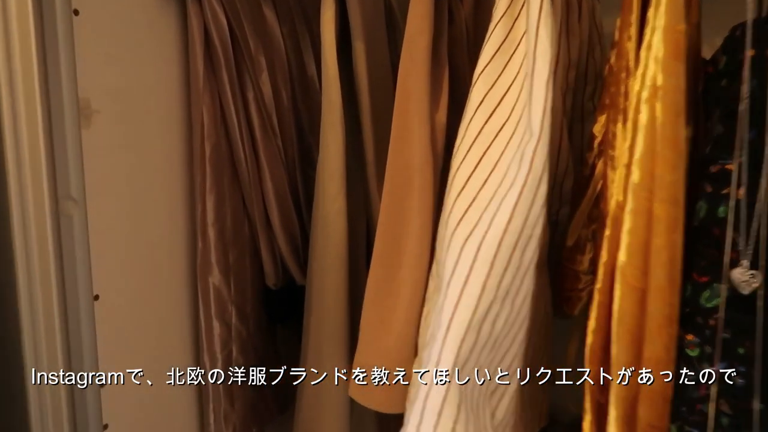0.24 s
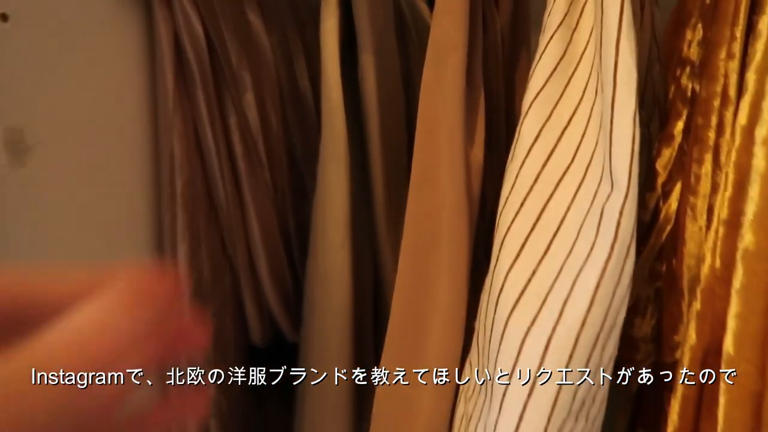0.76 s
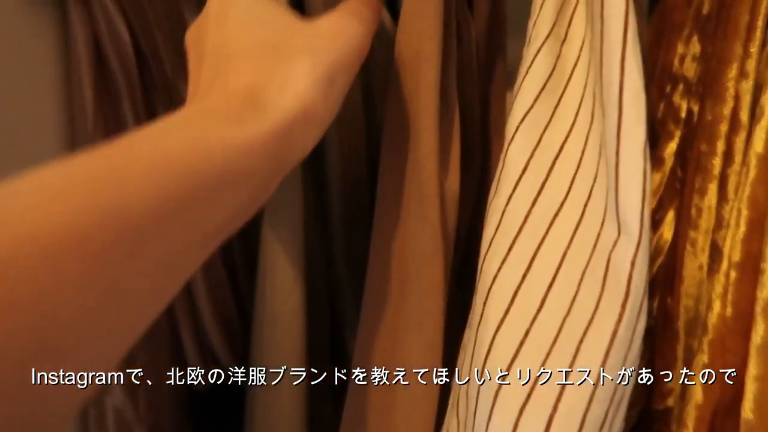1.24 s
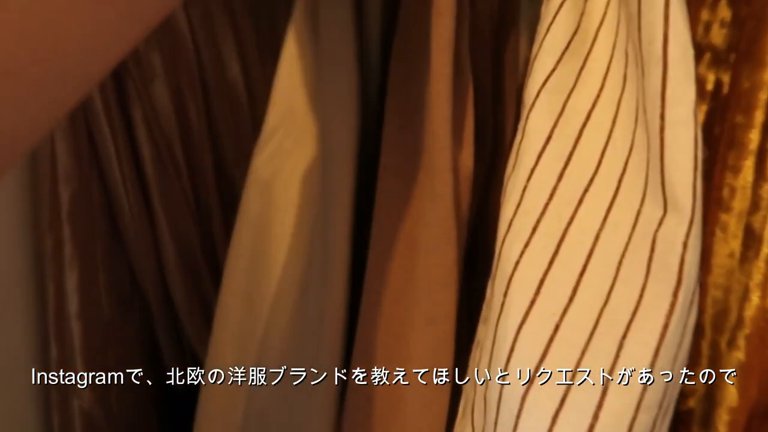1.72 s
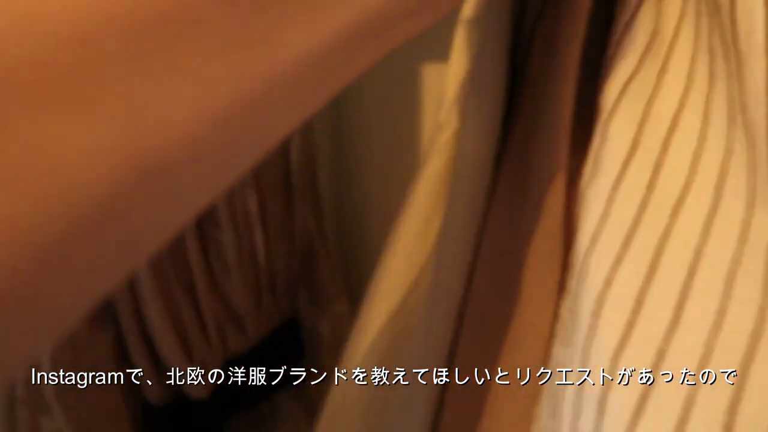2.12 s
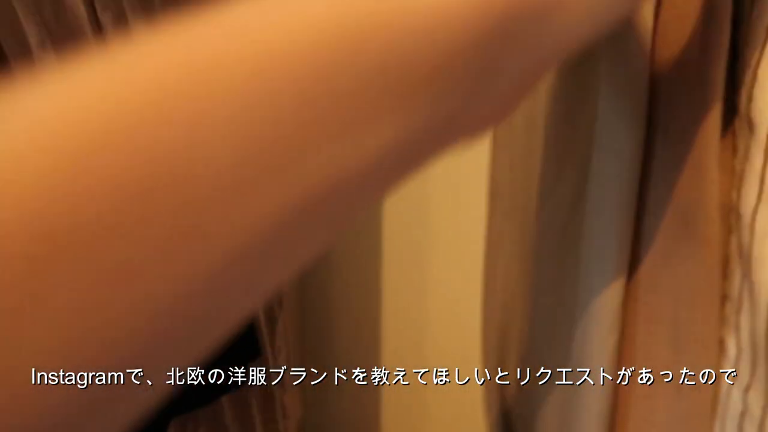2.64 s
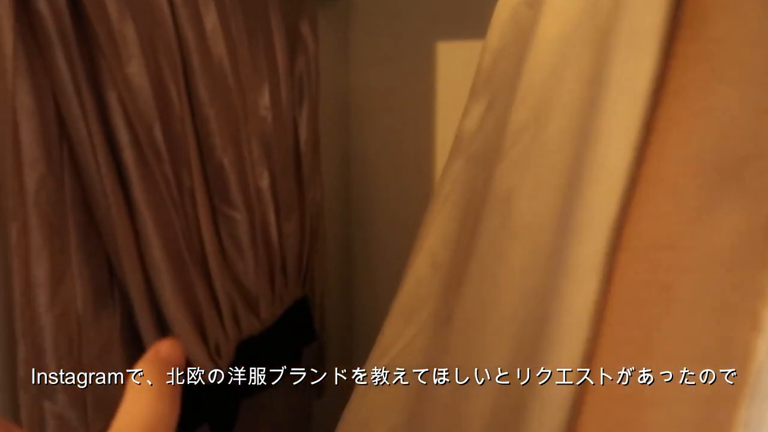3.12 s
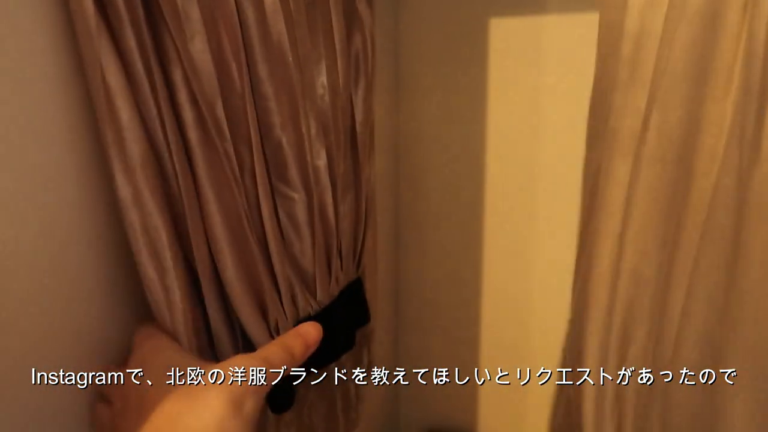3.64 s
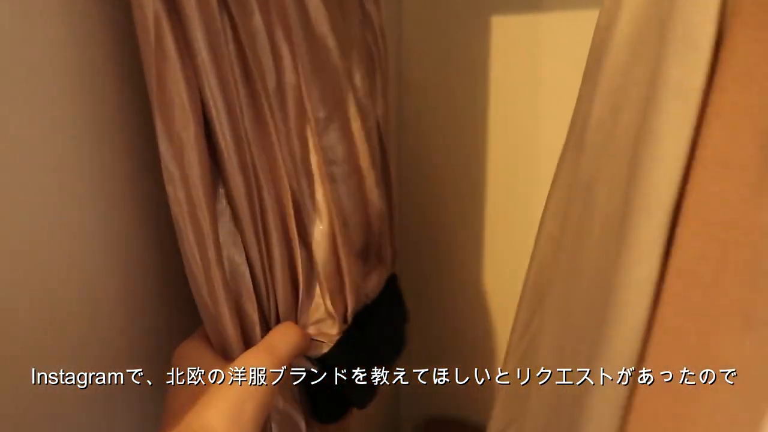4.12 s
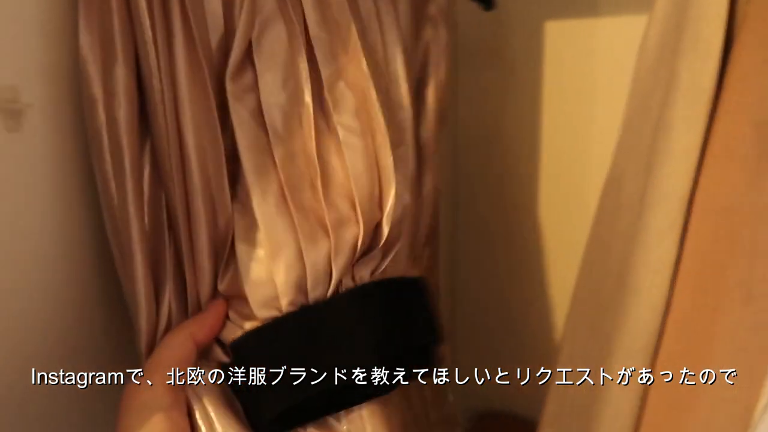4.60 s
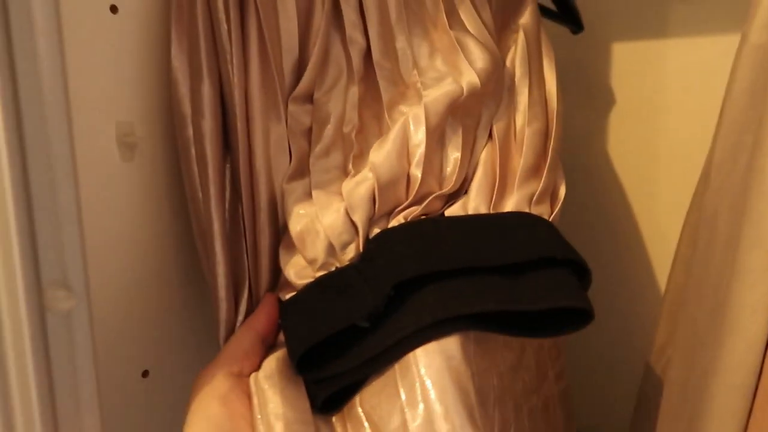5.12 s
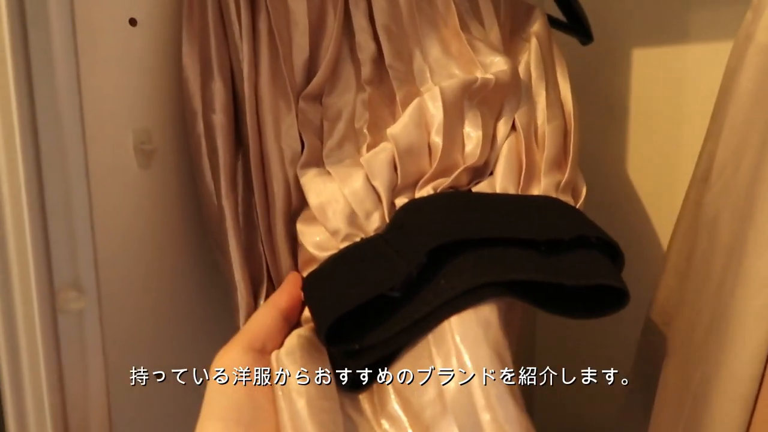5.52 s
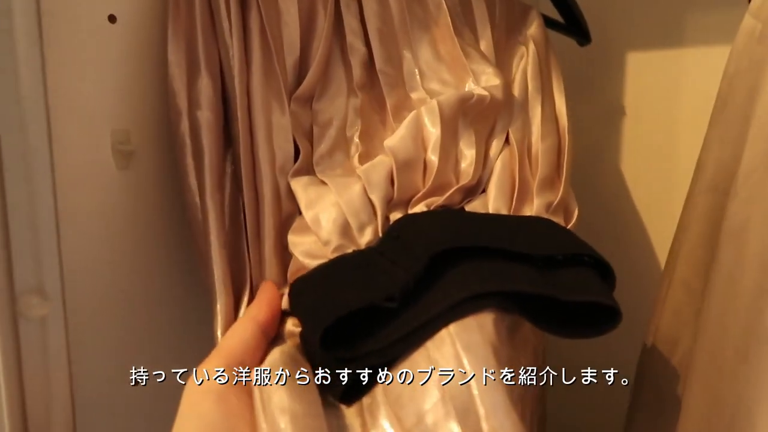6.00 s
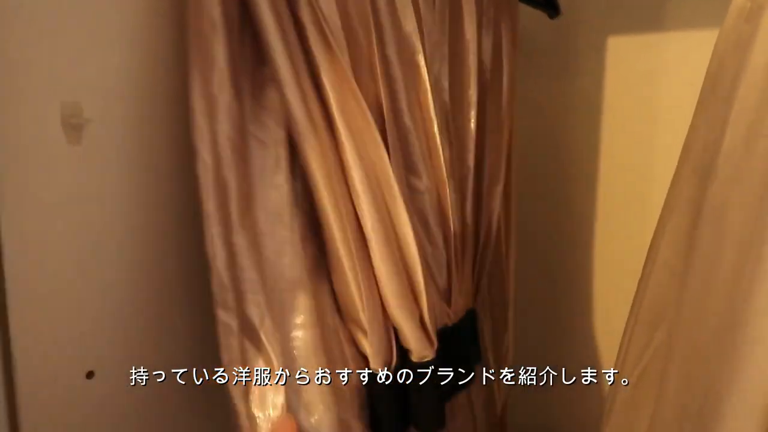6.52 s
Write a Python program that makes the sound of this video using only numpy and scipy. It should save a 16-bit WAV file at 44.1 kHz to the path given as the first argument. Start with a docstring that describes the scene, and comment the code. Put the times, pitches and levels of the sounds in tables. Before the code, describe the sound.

In a small closet, hooks scrape and ring on the rail, hangers knock together, padded thumps follow, and a garment rustles lightly.

```python
"""Faint room hiss with mains hum, then a dull thud and bursts of clacking hangers from a small closet.
Clothes are pushed along the rail: hangers clack as noise bursts and decaying modes, hooks scrape and
squeak amid brief high tones and noise bursts, and the rail rings as a bank of resonators. Thuds are low
panel, frame and air modes. Cloth rustles softly as a garment is drawn out; dense reflections put hangers
and thuds in the closet."""
import sys
import numpy as np
from scipy import signal
from scipy.fft import rfft, irfft, next_fast_len
from scipy.io import wavfile

SR = 44100
rng = np.random.default_rng(int(sys.argv[2]) if len(sys.argv) > 2 else 0)


def to_wav(sig):
    """Store sig (one row per channel, or 1-D mono) as 16-bit WAV at the path in sys.argv[1].

    Samples outside -1..1 are clipped; the rate is SR.
    """
    pcm = np.clip(np.atleast_2d(sig), -1, 1) * 32767
    pcm = np.round(pcm).astype(np.int16)
    wavfile.write(sys.argv[1], SR, pcm.T)  # frames by channels


N = 297675
TIME_S = np.arange(N) / SR
CONTACT_ORDER = 3   # low-pass order of a blow's finite contact time

# hanger clacks: start_s, strength_db, brightness_db_per_octave, contact_cutoff_hz, base_t60_s, left_right_db,
# favoured modes [(pitch_hz, level_db over the strength), ..]
CLACKS = [(1.9077, -28, 3, 4950, 0.018, 0.0039, [(1370, -2.5), (1990, 0), (2160, -6), (2685, 3),
          (3050, -2.5), (3430, -7.5), (4170, 0), (4650, -7), (5750, -12.5), (7200, -12)]),
          (1.9123, -38, -1, 3500, .035, 0, [(1400, -1.5), (1990, 4), (2350, 1.5), (4450, 0)]),
          (1.9235, -43, -1.5, 4500, .04, 0, [(1420, -12), (2400, -2), (6150, -5)]),
          (1.929, -48.5, 0.5, 5000, .09, 0, [(1100, -5.5), (2680, 0), (4400, -6.5)]),
          (1.993, -35.5, 0, 3600, 0.02, 0.1, [(2370, -1.5), (3030, 3), (3365, -1)]),
          (1.9961, -34, 1.5, 5200, 0.055, -0.0079, [(1222, -1), (1480, -7.5), (2000, -9.5), (3030, -16),
          (4549, -5.5), (7450, -5.5)]), (2.018, -57.5, 3, 3000, 0.042, 0, [(1010, 14.5), (1222, 2)]),
          (2.034, -58, 1.5, 7150, 0.019, 0.14, [(1500, -10), (4550, -5)]),
          (2.2433, -33, 1.5, 4870, 0.024, 1.33, [(1340, -2.5), (2627, 1.5), (3790, 7.5), (3930, -2),
          (4231, 2.5), (4580, -5), (6150, -9)]), (2.254, -45, 1, 13500, .06, -0.14, [(2110, -1.5),
          (4440, 8)]), (2.298, -63, -0.5, 4500, .04, 0, [(1230, -0.5), (2700, 1)]),
          (2.333, -62.5, 3, 8980, 0.031, -.5, [(2300, -1.5), (5200, 3)]),
          (2.364, -35.5, 4.5, 3880, 0.046, -0.18, [(1250, -5.5), (1500, -7.5), (2013, 5.5), (2600, 2.5),
          (3450, -6), (4550, -5.5)]), (2.484, -69, 8, 10500, 0.089, -0.22, [(1017, 12.5), (3850, 17.5)]),
          (2.538, -56.5, -3, 3120, 0.35, 0.21, [(1232, 10.5), (2630, 3)]),
          (2.6244, -40, 3, 5240, 0.037, -0.15, [(1167, -0.5), (1700, -4.5)]),
          (2.655, -46, 1, 5200, 0.1, -0.45, [(1147, -2), (1255, -2)]),
          (2.691, -58, 0.5, 10970, 0.085, -0.14, [(2150, -12), (3950, -3)]),
          (2.731, -60.5, -3, 2480, 0.077, 0, [(1110, 3), (1890, -7)]),
          (2.832, -57, -1, 2220, 0.11, -0.5, [(1000, -2), (2040, -2)]),
          (3.0455, -32.5, 3.5, 3630, 0.034, -0.065, [(1700, -9.5), (2001, -2.5), (2560, -15.5), (3020, -7),
          (3650, -9.5), (4370, -6), (6400, -13)]), (3.109, -63.5, -1, 3340, 0.1, -0.23, [(2030, 1.5),
          (3020, 9)]), (3.122, -61, -2.5, 3350, 0.06, -1.3, [(1300, 2), (2030, 1), (3450, -7)]),
          (3.5154, -54, 2, 5960, 0.14, -0.7, [(1182, -14), (4380, -10)]),
          (3.5483, -57.5, 2.5, 6120, 0.044, -0.16, [(1200, 5.5), (3200, -7.5)]),
          (3.582, -36, 1, 4070, 0.046, -0.25, [(1111, -2.5), (1900, -12), (2800, -5.5), (3770, -5.5),
          (4650, -22), (5350, -11)]), (3.633, -37.5, 2.5, 4330, 0.028, -0.65, [(1188, -1), (3380, -11)]),
          (3.6567, -46.5, 2.5, 4230, 0.028, -0.4, [(1140, -8), (4699, -13)]),
          (3.75, -57.5, -1.5, 9100, 0.047, -0.17, [(1150, -2.5), (3390, -8.5)]),
          (4.083, -31, 0, 3130, 0.034, 1.1, [(1480, -9.5), (1672, 0), (2150, -3), (2450, -5), (2875, -11),
          (3150, 2), (4080, -10), (4330, -11), (5900, -18)]), (4.112, -57.5, -2.5, 3500, .05, 0, [(2160, 4),
          (3150, -4)]), (4.135, -51.5, -4.5, 3246, 0.07, 0.19, [(1610, -1.5), (2150, -1.5), (3300, -8)]),
          (4.7284, -34.5, 0.5, 2400, 0.042, 1.1, [(807, -14.5), (1120, -1), (1350, -2.5), (1580, -15),
          (1972, -1.5), (2090, -4), (3140, -12.5)]), (4.751, -61, -8, 2800, .05, 1.5, [(1373, 8),
          (2100, -7)]), (4.7835, -48.5, -7, 4510, 0.057, 1.15, [(1400, 1), (2044, 5.5), (3170, -6)]),
          (4.808, -50.5, 2, 1900, 0.044, 1.5, [(1080, 0), (1400, -4), (2040, -1)]),
          (4.962, -53, 6, 1767, 0.03, 2.04, [(1290, -1), (2000, -1.5), (2294, -2)]),
          (6.043, -67, -2, 10620, .03, -0.12, [(1137, -7.5), (4340, -12.5)])]
# strong bending modes of a hanger: pitch_hz, level_db
HANGER_MODES = [(870, -26.5), (1130, -10), (1410, -9), (1990, -7.5), (2640, -13.5), (3150, -15),
                (3830, -12.5), (4330, -12)]
# modes of the rail: pitch_hz, level_db, free_t60_s
RAIL_MODES = [(260, 2.5, 0.26), (273, 3.5, 0.56), (353.3, -1, .3), (436.2, -11, .2), (544.3, -17.5, 0.36),
              (758, -4.5, 0.48), (1035, -3.5, 0.082), (1230, -2.5, 0.12), (1328, -7.5, 0.15),
              (1487, -8.5, 0.2494), (1989, -11.5, .2), (2150, -11, 0.16), (2336, -9, 0.36),
              (2780, -12, 0.1694), (3330, -11.5, .42), (3560, -9, .2), (3890, -12, .12), (4160, -13, 0.12),
              (4574, -14, 0.27), (5080, -15, 0.39), (6300, -16.5, 0.23)]
# spectrum of hooks on the rail: frequency_hz, relative_db (per Hz)
HOOK_SPECTRUM = [(7000, -27.5), (9300, 3), (11000, -3), (12800, 4), (15000, -17)]
# pushes that slide the hooks: start_s, length_s, level_db, attack_s
PUSHES = [(1.867, 0.21, -52, 0.037), (2.066, 0.22, -45.5, 0.19), (2.19, 0.048, -39.5, .06),
          (2.311, 0.14, -47.5, 0.026)]


def from_db(db):
    """Decibels to gain."""
    return np.exp(np.log(10) / 20 * np.asarray(db))


def rms_one(x):
    """Scale to unit power."""
    return x / np.sqrt(np.mean(x ** 2) + 1e-20)


def at_hz(points, hz):
    """Read a spectrum on a log-frequency axis."""
    point_hz, value = np.transpose(points)
    return np.interp(np.log(hz), np.log(point_hz), value)


def band(x, low_hz, high_hz, order=2):
    """Causal band-pass."""
    return signal.sosfilt(signal.butter(order, [low_hz, high_hz], "band", fs=SR, output="sos"), x)


def add(out, start_s, sound):
    """Mix a sound in from start_s."""
    i = max(int(start_s * SR), 0)
    out[..., i:i + sound.shape[-1]] += sound[..., :N - i]


def dying(t_s, t60_s, rise_s):
    """A quick swell, then exponential decay."""
    return (1 - np.exp(-t_s / rise_s)) * np.exp(-np.log(1000) * t_s / t60_s)


def drift(per_s):
    """A smooth random wander between normally distributed knots."""
    knots = rng.standard_normal(6000)
    return np.interp(TIME_S * per_s, np.arange(len(knots)), knots)


def ring(drive, hz, t60_s):
    """One mode: a unit click sets a decaying sine of height 1 ringing."""
    radius = from_db(-60 / (t60_s * SR))
    angle = 2 * np.pi * hz / SR
    feedback = [1, -2 * radius * np.cos(angle), radius * radius]
    return signal.lfilter([0, np.sin(angle)], feedback, drive + 1e-18)   # offset avoids denormals


def slips(per_s, spread_db):
    """Friction as a train of tiny slips of uneven size."""
    sizes = from_db(spread_db * np.minimum(rng.exponential(1, N), 4)) * rng.standard_normal(N)
    return rms_one(sizes * (rng.random(N) < per_s / SR))


def stereo(mid, side, alike):
    """Mix two independent noises into left and right of a given correlation."""
    return np.sqrt(1 + alike) * mid + np.sqrt(1 - alike) * side * [[1], [-1]]


def coloured(spectrum, likeness):
    """Stereo noise of a given colour and left-right correlation, unit power."""
    size = next_fast_len(N)
    hz = np.maximum(np.fft.rfftfreq(size, 1 / SR), 1)
    alike = np.clip(at_hz(likeness, hz), -1, 1)
    mid, side = rfft(rng.standard_normal((2, size))) * from_db(at_hz(spectrum, hz))
    return rms_one(irfft(stereo(mid, side, alike), size)[:, :N])


def noise_bands(size, likeness):
    """Half-octave bands of stereo noise with their centres; together roughly white."""
    edges_hz = np.geomspace(20, 18000, 21)
    white = rng.standard_normal((2, 2, size))
    for k, (low_hz, high_hz) in enumerate(zip(edges_hz, edges_hz[1:])):
        hz = np.sqrt(low_hz * high_hz)
        mid, side = band(white[k % 2], low_hz, high_hz, order=3)
        alike = np.clip(at_hz(likeness, hz), -1, 1)
        yield hz, stereo(mid, side, alike) / np.sqrt(2)


def placed(x, pan_db, lag_samples_per_db=1.93):
    """A source off to one side reaches the far microphone weaker and a few samples later."""
    size = next_fast_len(len(x) + 64)
    half_lag = np.exp(1j * np.pi * np.arange(size // 2 + 1) / size * pan_db * lag_samples_per_db)
    left = irfft(rfft(x, size) * half_lag, size)[:len(x)]
    right = irfft(rfft(x, size) * half_lag.conj(), size)[:len(x)]
    return np.array([left * from_db(pan_db / 2), right * from_db(-pan_db / 2)])


def at_ports(x):
    """The two microphone ports hear the treble out of step."""
    # phase by which left trails right: frequency_hz, lag_rad
    port_lag = [(60, 0), (400, .08), (1500, .24), (4000, .55), (6000, 1.2), (8000, 2.3), (14000, 2.1)]
    size = next_fast_len(N + 256)
    lag_rad = at_hz(port_lag, np.maximum(np.fft.rfftfreq(size, 1 / SR), 1))
    return irfft(rfft(x, size) * np.exp(.5j * lag_rad * np.array([[-1], [1]])), size)[:, :N]


def room_tone(hiss_rms_db=-59.22):
    """Steady coloured hiss with faint sine tones of mains hum."""
    # room hiss: frequency_hz, relative_db (per Hz)
    air = [(12, -36.5), (20, -16.5), (44, -2.5), (74, -8), (103, -11.5), (126, -10.5), (225, -8), (342, -9),
           (372, -8), (550, -14), (687, -14), (768, -14), (5100, -26), (13100, -40.5), (15500, -54)]
    # mains hum: pitch_hz, rms_db
    mains = [(50, -78), (98, -71.5)]
    # left-right correlation: frequency_hz, correlation
    air_likeness = [(60, 1), (150, 0.74), (380, 0.094), (950, -0.2), (2380, 0.13), (5980, -0.034),
                    (15000, -0.2)]
    hum = sum(from_db(db) * np.sqrt(2) * np.sin(2 * np.pi * hz * TIME_S) for hz, db in mains)
    return from_db(hiss_rms_db) * coloured(air, air_likeness) + hum


def closet(x, build_s=0.00088):
    """Diffuse reflections, soon soaked up by the clothes."""
    # reverberation level: frequency_hz, level_db
    echo_db = [(150, -5), (350, -5.5), (800, -6.5), (2000, -16), (5000, -18), (12000, -13)]
    # reverberation time: frequency_hz, t60_s
    echo_t60_s = [(80, 0.62), (300, .4), (1500, 0.36), (4000, 0.4), (12000, 0.13)]
    t_s, echo = TIME_S[:SR // 2], 0
    for hz, noise in noise_bands(len(t_s), [(300, 1.0), (2000, 0.85), (8000, .6)]):
        shape = dying(t_s, at_hz(echo_t60_s, hz), build_s)
        echo = echo + from_db(at_hz(echo_db, hz)) * noise * shape / np.sqrt(np.sum(shape ** 2))
    return signal.fftconvolve(x, echo, axes=1)[:, :N]


def rustle(grain=0.3):
    """Cloth slides over cloth in a soft, grainy swell."""
    # brushes as the garment is drawn out: start_s, length_s, level_db at mid-swell
    brushes = [(4.1, 0.26, -63)]
    # satin: frequency_hz, relative_db (per Hz)
    satin = [(500, -25.5), (1500, 3), (3200, -2), (5500, -5), (8000, -13), (15000, -37)]
    swell = 0
    for start_s, length_s, db in brushes:
        swell = swell + from_db(db) * np.sin(np.pi * np.clip((TIME_S - start_s) / length_s, 0, 1))
    texture = rms_one(np.exp(grain * drift(per_s=120)))
    return swell * texture * coloured(satin, [(1000, .8), (8000, .5)])


def bumps(rattle=0.23, rattle_t60_s=0.214, lowest_hz=42):
    """A soft, cloth-padded blow rings a low panel mode among neighbours, the frame and the air in the closet."""
    # blows: start_s, level_db, panel_hz, panel_t60_s, rise_s, knock_db (frame over panel)
    blows = [(1.439, -32.5, 111, 0.096, 0.015, -28), (1.794, -45, 142, 0.27, 0.037, -4),
             (1.846, -29, 138, 0.14, 0.031, -15), (1.884, -34, 135, 0.26, 0.005, -13),
             (1.998, -21.5, 149.3, 0.18, 0.043, -22), (2.19, -47, 134, 0.37, 0.02, -4),
             (2.245, -28, 144, 0.12, 0.0051, -0.5), (2.432, -26.5, 114, 0.09, 0.038, -1),
             (2.514, -46, 114, 0.54, 0.02, -8), (2.581, -40, 114.3, 0.37, 0.023, -10),
             (3.048, -44.5, 170, 0.27, 0.0052, 4), (3.447, -36, 94.4, 0.1, 0.0049, -15),
             (3.509, -41.5, 104.6, 0.13, 0.0033, -8), (3.588, -22.5, 104.5, 0.042, 0.0044, -25),
             (3.614, -34.5, 90.3, 0.1, 0.004, -9.5), (3.7606, -17.5, 88.6, 0.051, 0.002, -13.5),
             (3.845, -45, 72.4, .2, 0.0063, -20), (4.084, -38, 108.6, 0.32, 0.0029, 9.5),
             (4.732, -22.5, 121, 0.064, 0.0019, -1.5), (4.787, -29, 121, 0.061, 0.0043, -6.5),
             (4.811, -32.5, 104, 0.072, 0.0038, 0.5)]
    # closet frame: pitch_hz, level_db, t60_s
    frame = [(275, -2, 0.066), (301, 0, 0.09), (343.7, -8, 0.14), (435, -2.5, .06), (558, -13, 0.12)]
    boom_hz, boom_t60_s = 55.03, 0.3
    out, t_s = np.zeros(N), TIME_S[:SR // 2]
    for start_s, db, panel_hz, panel_t60_s, rise_s, knock_db in blows:
        # the further above the boom a panel lies, the less it stirs the air
        boom_db = 8 - 27.5 * np.log2(panel_hz / boom_hz)
        modes = [(panel_hz, 0, panel_t60_s), (boom_hz, boom_db, boom_t60_s)]
        modes += [(hz, knock_db + mode_db, t60_s) for hz, mode_db, t60_s in frame]
        tones = 0
        for hz, mode_db, t60_s in modes:
            tones = tones + from_db(mode_db) * np.sin(2 * np.pi * hz * t_s) * dying(t_s, t60_s, rise_s)
        others = rms_one(band(rng.standard_normal(len(t_s)), panel_hz * 0.53, panel_hz * 1.4, order=3))
        add(out, start_s, from_db(db) * (tones + rattle * others * dying(t_s, rattle_t60_s, rise_s)))
    # small panels radiate no deep bass
    return signal.sosfilt(signal.butter(3, lowest_hz, "high", fs=SR, output="sos"), out)


def squeaks(waver=.005, shimmer_db=4.5):
    """A turning hook sticks and slips: one mode sings for a while, wavering in pitch and level. A faint brush
    of cloth is played the same way."""
    # squeaks and groans, the first row a faint brush of cloth: start_s, length_s, pitch_hz, level_db
    songs = [(1.44, 0.03, 3800, -61), (1.935, 0.08, 2300, -40), (1.912, 0.077, 6150, -51),
             (1.894, 0.19, 755, -46), (1.911, 0.096, 416, -47.5), (2.251, 0.33, 251.7, -46.5),
             (2.363, 0.11, 775, -55.5), (2.379, 0.11, 3505, -57), (2.386, 0.044, 551, -49),
             (2.541, .09, 349.6, -50.5), (4.245, 0.081, 3160, -59.5), (4.783, 0.04, 3150, -55),
             (4.84, 0.089, 3150, -72.5), (5.1, 0.092, 3170, -74)]
    out = np.zeros(N)
    for start_s, length_s, hz, db in songs:
        size = int(length_s * SR)
        swell = np.sin(np.pi * TIME_S[:size] / length_s)
        phase = 2 * np.pi * np.cumsum(hz * (1 + waver * drift(per_s=150)[:size])) / SR
        add(out, start_s, swell * from_db(db + shimmer_db * drift(per_s=70)[:size]) * np.sin(phase))
    return out


def hook_hits(unevenness=.5):
    """Short, very high bursts of noise, randomly uneven in level, as metal meets metal."""
    # hooks striking and biting the rail: start_s, level_db, t60_s, rise_s
    strikes = [(1.907, -32.5, 0.018, 0.00098), (1.935, -44.5, .25, .03), (1.9957, -33.5, 0.056, 0.001),
               (2.128, -53, .04, .002), (2.215, -30.5, 0.15, 0.03), (2.2447, -22, 0.03, 0.0018),
               (2.333, -43, 0.043, .002), (2.419, -48, 0.036, .001), (2.478, -43, 0.063, .002),
               (2.496, -45, 0.037, .002), (3.549, -50, 0.016, 0.00092)]
    level, t_s = np.zeros(N), TIME_S[:SR // 3]
    for start_s, db, t60_s, rise_s in strikes:
        add(level, start_s, from_db(db) * dying(t_s, t60_s, rise_s))
    flutter = rms_one(np.exp(unevenness * drift(per_s=700)))
    return level * flutter * coloured(HOOK_SPECTRUM, [(1000, .9), (12000, 0.6)])


def pushing(release_t60_s, follows=1.0):
    """Each push swells, holds and dies away; `follows` scales how far in dB weaker pushes lie below the top."""
    top_db = max(db for _, _, db, _ in PUSHES)
    level = 0
    for start_s, length_s, db, attack_s in PUSHES:
        attack = np.clip((TIME_S - start_s) / attack_s, 0, 1)
        release = np.exp(-np.log(1000) * np.maximum(TIME_S - start_s - length_s, 0) / release_t60_s)
        level = np.maximum(level, from_db(top_db + follows * (db - top_db)) * attack * release)
    return level


def high_tones(per_s=170, level_db=-9.0, tilt_db_per_octave=-2.0, spread_db=4.5, t60_s=.045,
               low_hz=3300, high_hz=13000):
    """Brief high tones of random pitch, four at a time, scattered through the scrape."""
    push = pushing(release_t60_s=0.46)
    out, t_s = np.zeros(N), TIME_S[:SR // 8]
    draws = rng.random((170, 6))   # gap, size, four pitches
    starts_s = PUSHES[0][0] + np.cumsum(-np.log(draws[:, 0])) / per_s
    for start_s, (_, size, *pitches) in zip(starts_s, draws):
        if start_s < TIME_S[-1]:
            tones = 0
            for hz in low_hz * (high_hz / low_hz) ** np.array(pitches):
                tone_db = tilt_db_per_octave * np.log2(hz / low_hz)
                tones = tones + from_db(tone_db) * np.sin(2 * np.pi * hz * t_s)
            gain = push[int(start_s * SR)] * from_db(level_db + spread_db * (2 * size - 1))
            add(out, start_s, gain * tones * dying(t_s, t60_s, rise_s=.0003))
    return out


def squeal(drive, hz=12550, t60_s=0.02085, rms_db=-1.5):
    """The wire of the hook rings very high as it rubs."""
    return from_db(rms_db) * rms_one(ring(drive, hz, t60_s))


def travelling(mode, bend, wander_db, per_s):
    """The moving weight of the hooks bends a mode's pitch; it swells and fades as they pass its nodes."""
    load = drift(per_s)
    bent = np.interp(TIME_S + np.cumsum(bend * load) / SR, TIME_S, mode)
    return bent * from_db(wander_db * load)


def sliding(hum_db=-8.0, sing_db=0.5, rub_db=-6.0, hiss_db=-12.5, grain=0.5, split_hz=600):
    """Hooks rub along the rail, ringing and damping its modes, with a grainy scrape and a fine hiss."""
    # rubbing noise: frequency_hz, relative_db (per Hz)
    rub_spectrum = [(290, -36.5), (500, -19), (557, 5), (592, -24.5), (773, -1.5), (841, -13), (1240, 1),
                    (1640, -14.5), (3460, 1), (9000, -6), (11700, -59.5), (19800, -120)]
    hum = pushing(release_t60_s=0.92, follows=0.47)
    scrape = pushing(release_t60_s=0.61)
    hiss = pushing(release_t60_s=0.22, follows=1.9)
    # heavy low modes feel the even drag, light high ones each single slip
    drag, slip_train = rng.standard_normal(N), slips(per_s=3000, spread_db=3.5)
    heavy = band(drag, 200, 400)
    low, high = 0, 0
    for hz, db, t60_s in RAIL_MODES:
        drive = heavy if hz < split_hz else slip_train
        mode = rms_one(ring(drive, hz, min(t60_s, .11)))   # hooks damp the rail
        mode = from_db(db) * travelling(mode, bend=.03, wander_db=4.5, per_s=45)
        if hz < split_hz:
            low = low + mode
        else:
            high = high + mode
    catches = rms_one(np.exp(grain * (.5 * drift(per_s=60) + drift(per_s=420))))
    rub = from_db(rub_db) * scrape * coloured(rub_spectrum, [(1000, 0.79), (8000, 0.8)])
    hook_noise = coloured(HOOK_SPECTRUM, [(1000, 0.72), (12000, 0.39)]) + squeal(drag)
    fine = from_db(hiss_db) * hiss * hook_noise
    humming = from_db(hum_db) * hum * rms_one(low)
    singing = from_db(sing_db) * scrape * rms_one(high)
    return humming + singing + catches * (rub + fine)


def force_db(hz, db, brightness_db_per_octave, contact_hz):
    """Spectrum of a blow: tilted about 2 kHz, falling steeply above the cut-off set by its contact time."""
    octaves = np.log2(hz / 2000)
    contact_loss_db = 10 * np.log10(1 + (hz / contact_hz) ** (2 * CONTACT_ORDER))
    return db + brightness_db_per_octave * octaves - contact_loss_db


def rail_ring(coupling_db=-11.0, tilt_db_per_octave=4.0, spread_db=1.9):
    """Every clack travels through the hook and rings the rail; the wire favours the treble."""
    out = np.zeros(N)
    for hz, mode_db, t60_s in RAIL_MODES:
        blows = np.zeros(N)
        for start_s, db, brightness, contact_hz, *_ in CLACKS:
            blow_db = force_db(hz, db, brightness + tilt_db_per_octave, contact_hz) + rng.normal(0, spread_db)
            blows[int(start_s * SR)] = from_db(blow_db + mode_db + coupling_db)
        out += ring(blows, hz, t60_s)
    return out


def chatter(level_db=-10.5, t60_s=0.036):
    """While hooks slide, hangers nudge each other; each touch strikes their bending modes with new strengths."""
    touches = slips(per_s=400, spread_db=2.0)
    rattle = sum(from_db(db) * ring(touches * rng.standard_normal(N), hz, t60_s) for hz, db in HANGER_MODES)
    return from_db(level_db) * pushing(release_t60_s=0.35) * rms_one(rattle)


def softened(x, contact_hz):
    """The finite contact time rounds off the treble."""
    return signal.sosfilt(signal.butter(CONTACT_ORDER, min(contact_hz, 15000), fs=SR, output="sos"), x)


def at_level(x, rms_db, head_s=.02):
    """Give the head of a clack this rms level."""
    return from_db(rms_db) * x / np.sqrt(np.mean(x[:int(head_s * SR)] ** 2) + 1e-20)


def narrow_noise(t_s, hz, knots_per_s=220):
    """A narrow band of noise about one pitch: strength and phase wander at random."""
    knots = rng.standard_normal((2, 64))
    sine, cosine = (np.interp(t_s * knots_per_s, np.arange(64), row) for row in knots)
    return sine * np.sin(2 * np.pi * hz * t_s) + cosine * np.cos(2 * np.pi * hz * t_s)


def clacks(crack_t60_s=0.0034, damping=0.1431, mode_life=0.72, longest_t60_s=.06, dense_db=0.5, modes_db=-4.5,
           detune=0.023, second_gain=0.67, rise_s=0.0016, linger=0.095, linger_t60_s=0.091):
    """Each contact: a hard crack, a wash of close damped modes, bending modes and lingering favoured ones."""
    # crowd of close hanger modes: low_hz, high_hz, level_db
    crowd = [(230.5, 480, -9.5), (439.6, 660, -25), (655.3, 1510, -6.5), (1547, 3000, -4.5),
             (3043, 4900, -2.5), (5220, 9630, 3.5), (8070, 20000, 0)]
    out, t_s = np.zeros((2, N)), TIME_S[:SR // 6]
    for start_s, db, brightness, contact_hz, t60_s, pan_db, favoured in CLACKS:
        hit = np.zeros(len(t_s))
        for low_hz, high_hz, band_db in crowd:
            hz = np.sqrt(low_hz * high_hz)
            life_s = t60_s * (2000 / hz) ** damping   # high modes die sooner
            shape = dying(t_s, crack_t60_s, rise_s) + dying(t_s, life_s, rise_s)
            wash = band(rng.standard_normal(len(t_s)) * shape, low_hz, high_hz, order=4)
            wash_db = force_db(hz, db, brightness, contact_hz) + band_db + dense_db
            hit += at_level(softened(wash, contact_hz), wash_db)
        # the garment on a hanger damps the main ring
        ringing = dying(t_s, min(t60_s * mode_life, longest_t60_s), rise_s)
        for hz, mode_db in HANGER_MODES:
            # each mode is a close pair of tones, randomly detuned up or down, for a broader ring
            first = np.sin(2 * np.pi * (hz * t_s + rng.random()))
            second_hz = hz * (1 + detune * rng.choice([-1, 1]))
            second = np.sin(2 * np.pi * (second_hz * t_s + rng.random()))
            bending_db = force_db(hz, db, brightness, contact_hz) + mode_db + modes_db
            hit += at_level((first + second_gain * second) * ringing, bending_db)
        for hz, mode_db in favoured:
            tail_shape = dying(t_s, linger_t60_s * min(1, 3000 / hz), rise_s)
            tail = linger * tail_shape * narrow_noise(t_s, hz)
            tone = np.sin(2 * np.pi * (hz * t_s + rng.random())) * ringing
            hit += at_level(tone + tail, db + mode_db)
        add(out, start_s, placed(hit, pan_db))
    return out


def scene(bump_wet_db=-6.0):
    """Hangers, rail, bumps and cloth in the closet, over the room tone."""
    hangers = clacks() + chatter()
    thuds = bumps()
    echoes = closet(hangers + from_db(bump_wet_db) * thuds)
    rail = rail_ring() + sliding() + squeaks() + hook_hits() + high_tones()
    return at_ports(hangers + thuds + echoes + rail + rustle()) + room_tone()


def record(dry, ceiling=.58, cutoff_hz=14800):
    """The loudest peaks are rounded and the top is cut steeply."""
    rounded = dry / (1 + (dry / ceiling) ** 4) ** (1 / 4)
    return signal.sosfilt(signal.ellip(10, .1, 80, cutoff_hz, fs=SR, output="sos"), rounded)


dry = scene()
out = record(dry)
to_wav(out)
```